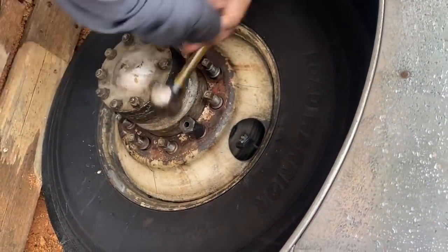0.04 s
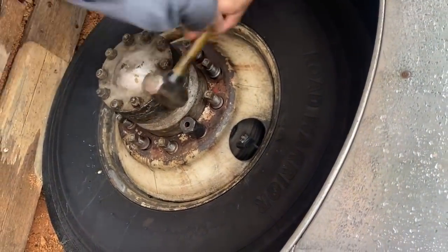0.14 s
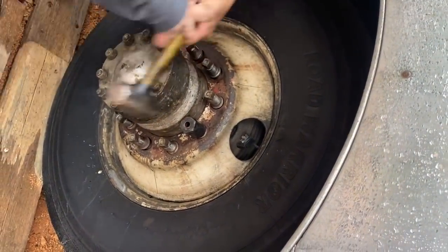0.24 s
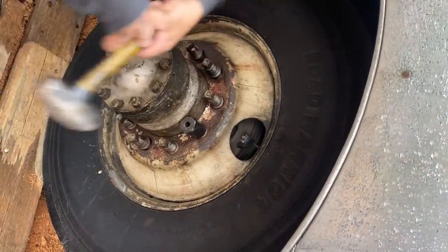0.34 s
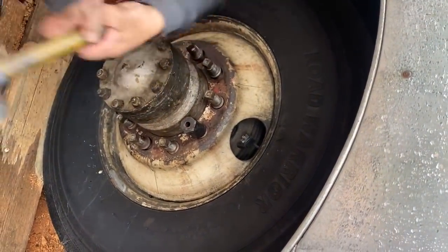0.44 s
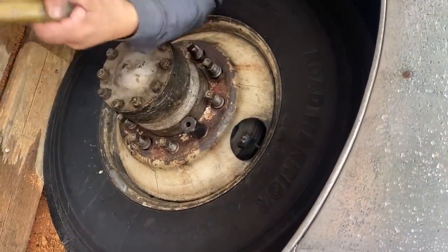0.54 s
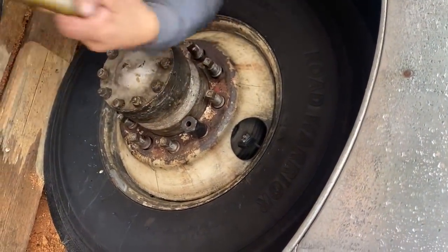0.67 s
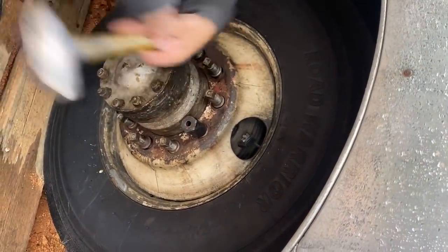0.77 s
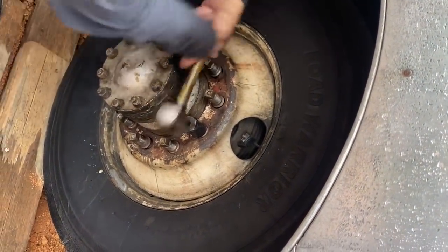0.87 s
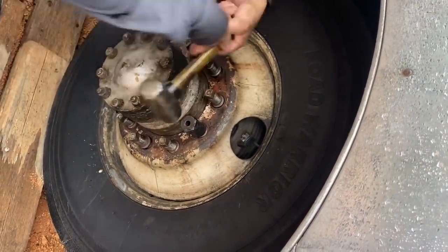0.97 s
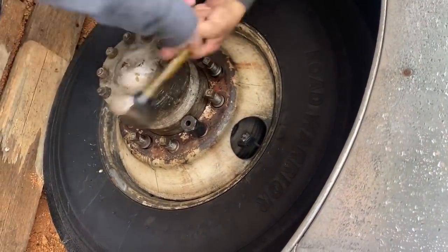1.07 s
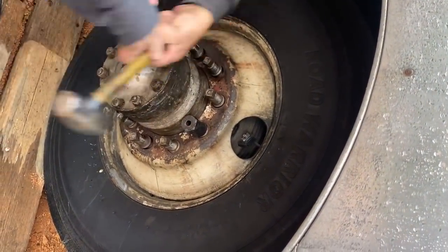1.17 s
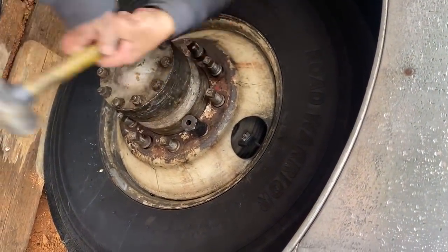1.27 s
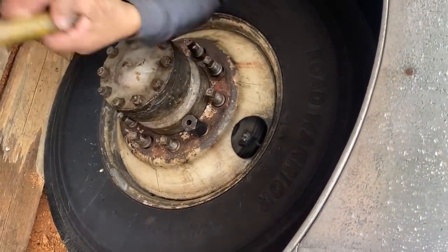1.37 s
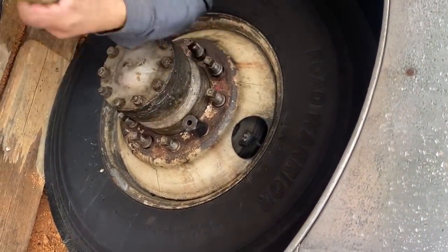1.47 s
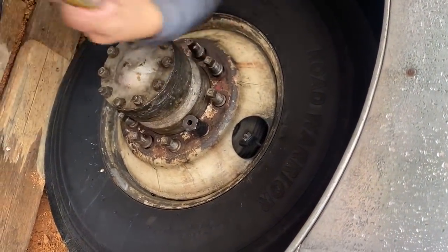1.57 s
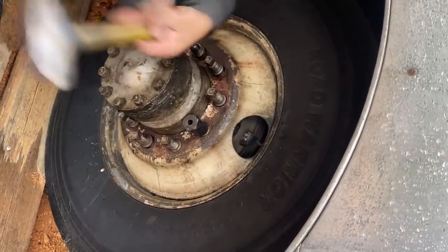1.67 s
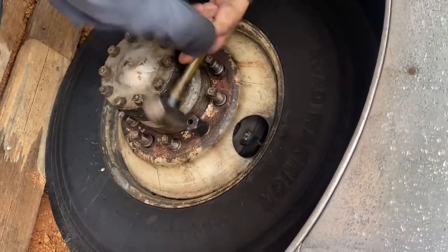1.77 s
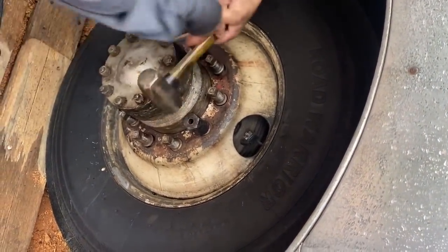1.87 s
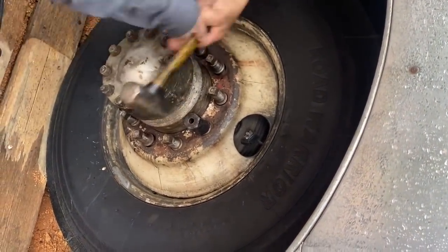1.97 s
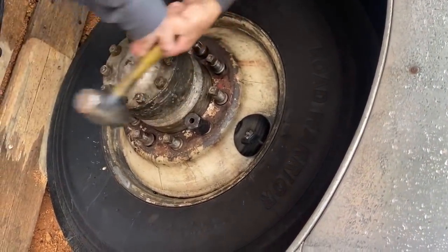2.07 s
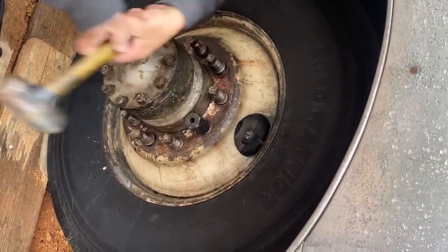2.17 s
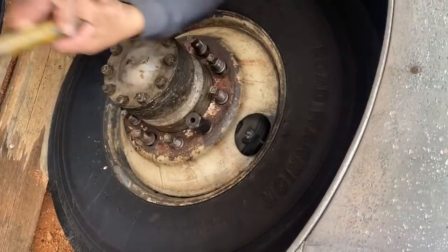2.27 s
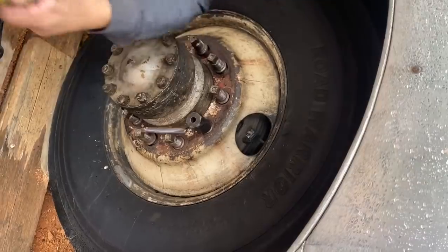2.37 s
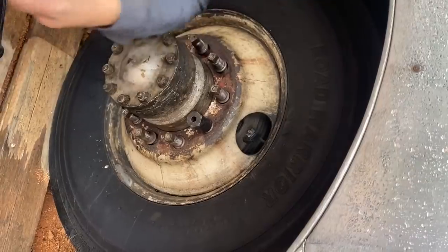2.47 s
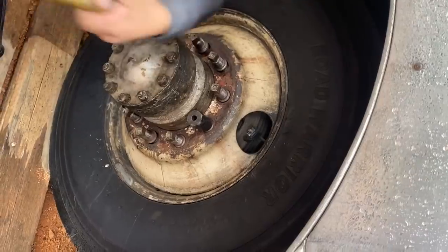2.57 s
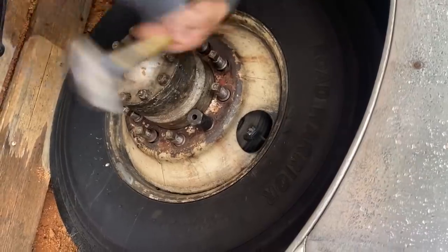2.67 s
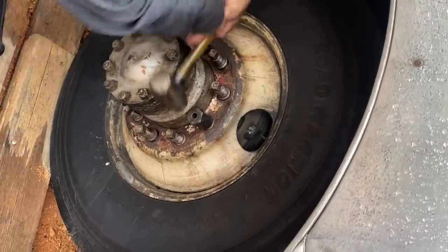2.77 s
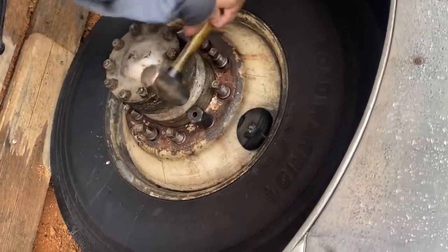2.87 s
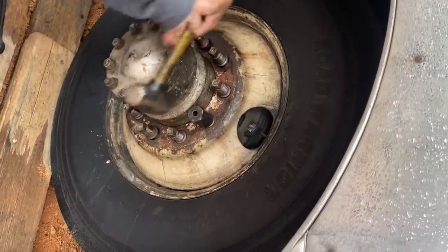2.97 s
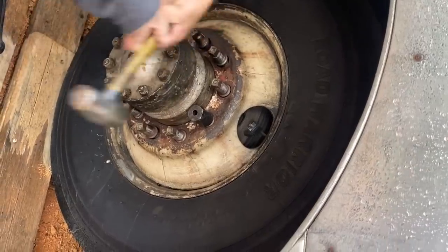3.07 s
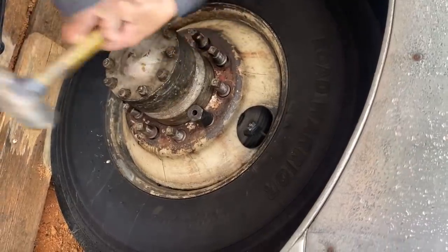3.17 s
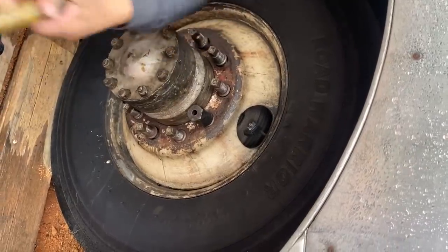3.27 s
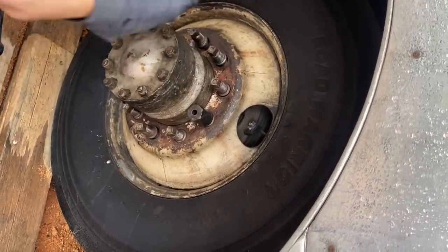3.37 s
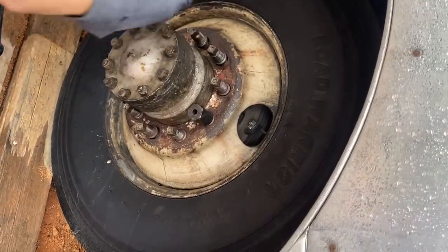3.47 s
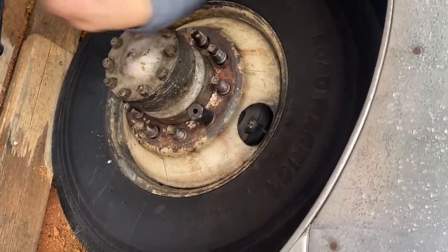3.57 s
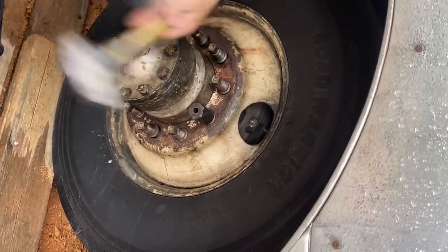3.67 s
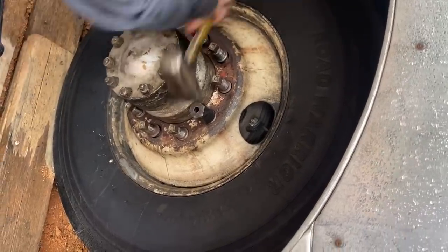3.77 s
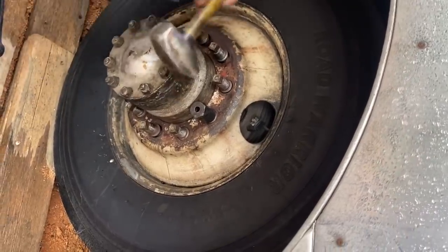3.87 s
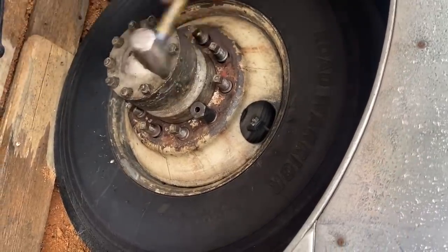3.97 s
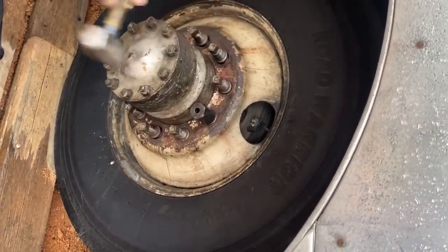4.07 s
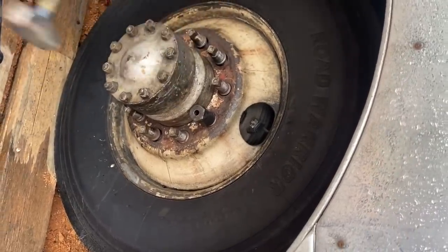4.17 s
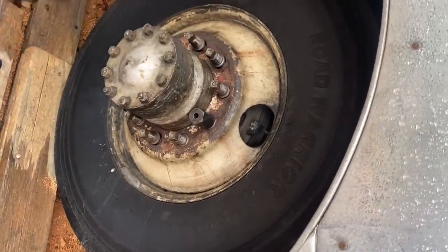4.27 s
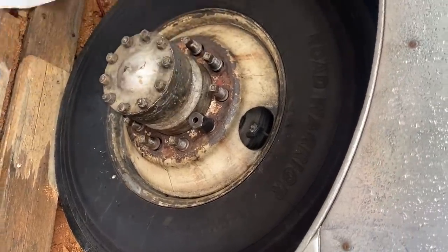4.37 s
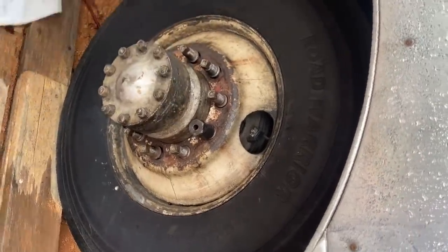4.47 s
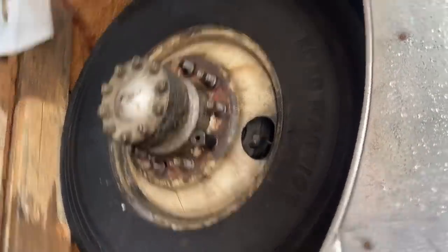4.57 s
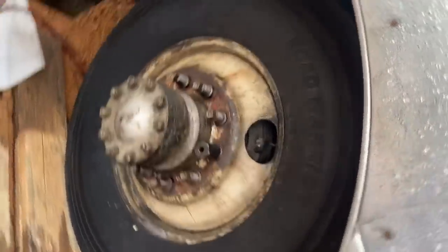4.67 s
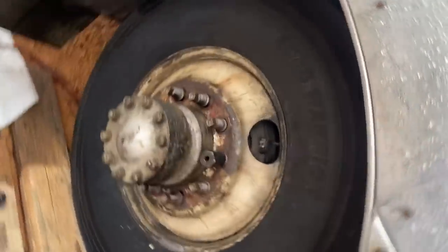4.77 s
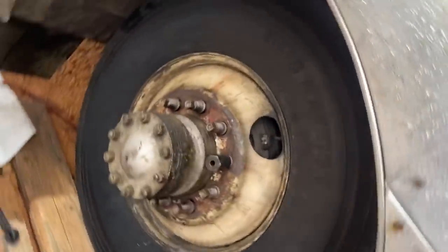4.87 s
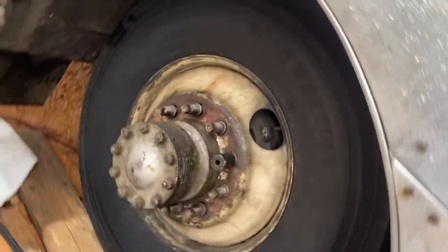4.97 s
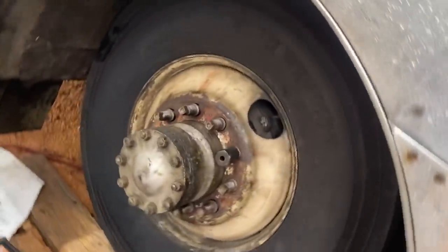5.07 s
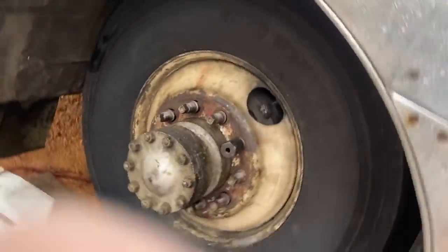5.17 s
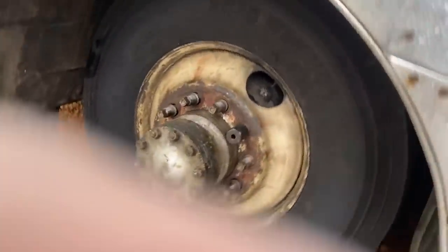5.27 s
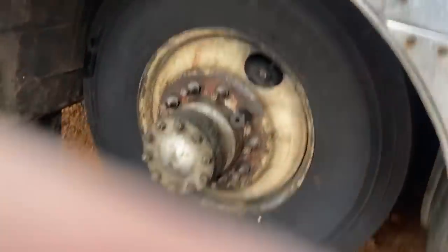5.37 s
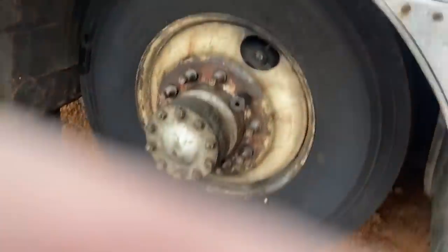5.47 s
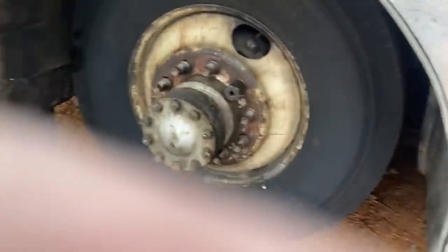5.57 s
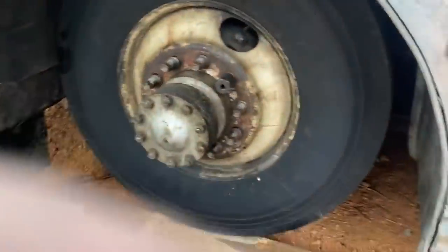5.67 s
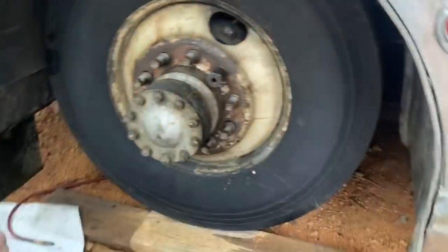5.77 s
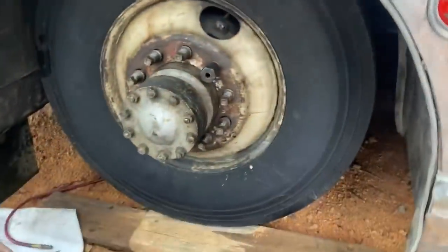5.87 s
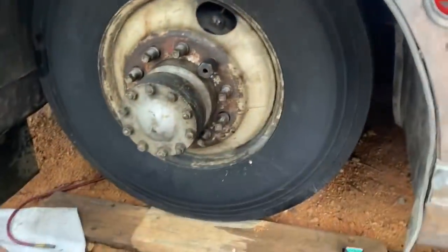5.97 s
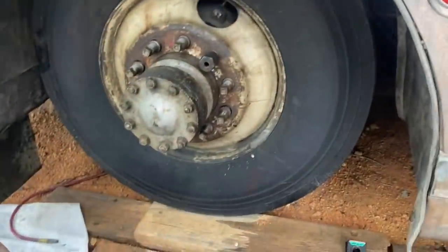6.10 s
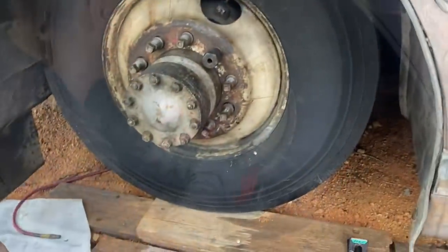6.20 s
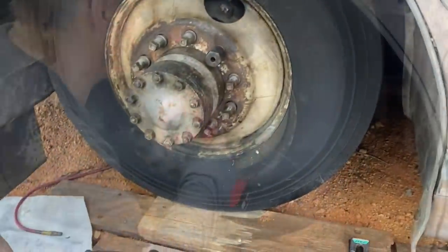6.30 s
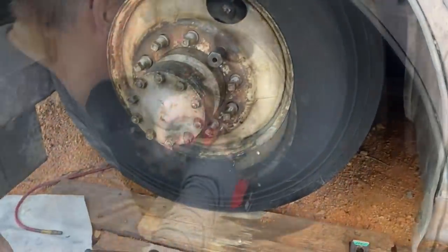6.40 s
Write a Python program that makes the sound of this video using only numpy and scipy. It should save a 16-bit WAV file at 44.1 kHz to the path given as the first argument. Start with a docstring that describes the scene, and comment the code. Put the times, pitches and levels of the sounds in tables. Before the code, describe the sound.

Close by in a yard, a sledgehammer hits a steel socket on a truck wheel nut five times, about once a second. Each blow is a sharp metal clank, followed by a softer ring from the rim and a low boom from the tyre. Then fingers briefly rub, squeak and bump on the hand-held microphone, and something gritty crunches at the end. Faint ticks, far traffic and hiss lie underneath.

```python
"""A sledge hammer strikes a steel socket on a truck wheel nut five times, near a hand-held camera in a yard.
Socket and hub clank briefly; the rim and the air in the tyre ring on. A diffuse ring swells up after
each blow, then fades. Faint ticks sound over far traffic and microphone hiss. Then fingers rub, squeak
and bump on the camera housing, and something crunches close by as the background grows louder."""
import sys
import numpy as np
from scipy import signal
from scipy.fft import rfft, irfft, next_fast_len
from scipy.io import wavfile
from scipy.ndimage import map_coordinates

SR = 44100
rng = np.random.default_rng(int(sys.argv[2]) if len(sys.argv) > 2 else 0)


def store_wav(level_fs):
    """Save 16-bit WAV to argv[1]."""
    pcm = np.round(np.clip(np.atleast_2d(level_fs), -1, 1) * 32767)
    wavfile.write(sys.argv[1], SR, pcm.T.astype(np.int16))


N = 283988


def amp(db):
    """Gain of a level in dB."""
    return 10 ** (np.asarray(db) / 20)


def unit(x):
    """x at rms 1."""
    return x / np.sqrt(np.mean(x ** 2) + 1e-20)


def along(points, hz):
    """Interpolate (frequency [Hz], value) points on a log axis."""
    knots_hz, values = np.transpose(points)
    return np.interp(np.log(hz + 1), np.log(knots_hz + 1), values)


def wobble(rate_hz):
    """Smooth random curve, rate_hz knots a second."""
    knots = rng.standard_normal(int(N * rate_hz / SR) + 4)
    return map_coordinates(knots, [np.arange(N) * rate_hz / SR])


def hiss(spectrum, size=N):
    """Coloured noise of rms 1."""
    n_fft = next_fast_len(size)
    gain = amp(along(spectrum, np.fft.rfftfreq(n_fft, 1 / SR)))
    return unit(irfft(rfft(rng.standard_normal(n_fft)) * gain, n_fft)[:size])


def fading_noise(spectrum, t60s, size):
    """Coloured noise, each frequency with its own decay time."""
    hz, t, bins = signal.stft(hiss(spectrum, size), SR, nperseg=256)
    decay = amp(-60 * t / along(t60s, hz)[:, None])
    return signal.istft(bins * decay, SR, nperseg=256)[1][:size]


def ringing(pitches_hz, modes, t, spread_db, rise_cycles, wander):
    """Damped modes at random strengths; low and long-ringing ones build up more slowly."""
    hz = np.array(pitches_hz)[:, None]
    db, t60_s = np.transpose(modes)[:, :, None]
    strength, phase = rng.standard_normal((2, len(hz), 1))
    walk = np.cumsum(rng.standard_normal((len(hz), len(t))), axis=1)
    drift_rad = wander * np.sqrt(hz / SR) * walk  # close neighbours blur each line
    rise = 1 - np.exp(-(t / (rise_cycles / hz + .035 * t60_s)) ** 2)
    decay = amp(db + spread_db * strength - 60 * t / t60_s)
    return np.sum(decay * rise * np.sin(2 * np.pi * hz * t + 3 * phase + drift_rad), axis=0)


def tilt(x, sos, db):
    """Boost or cut the filter's passband by about db."""
    return x + (amp(db) - 1) * signal.sosfilt(sos, x)


def ping_envelope(cycles, life_cycles):
    """Rise within about a cycle, then exponential decay."""
    return np.exp(-2.5 * cycles / life_cycles) * (1 - np.exp(-1.5 * cycles))


def stroke(start_s, hold_s, db, rise_db_s, drift_db_s, fall_db_s):
    """Gain per sample: reaches db at start_s, drifts while held, then dies."""
    t = np.arange(N) / SR - start_s
    held_db = db + drift_db_s * np.clip(t, 0, hold_s)
    return amp(held_db + rise_db_s * np.minimum(t, 0) - fall_db_s * np.maximum(t - hold_s, 0))


def add(track, at_s, sound):
    """Mix a sound into a track that starts at -1 s."""
    part = track[SR + round(at_s * SR):][:len(sound)]
    part += sound[:len(part)]


def socket_clank(t, thud_band):
    """Socket and hub: a contact crack and short steel modes, the dense ones as noise."""
    # socket and hub modes (pitch [Hz])
    steel_hz = [140, 183, 235, 430, 556, 677, 990, 1168, 1400, 1500, 1630, 2015, 2085, 2191, 2420, 2630,
                2813, 2907, 3040, 3181, 3600, 3873, 4420, 4790, 5140, 5720, 5920, 6500, 7500, 8500]
    # per mode (level [dB], t60 [s])
    steel_modes = [(-6, .05), (-14, .2), (-5, .04), (4, .045), (-13, .13), (-9, .04), (-2, .045), (-1, .05),
                   (-16, .15), (-3, .045), (-3, .05), (-2, .075), (-5, .11), (-7, .125), (-11, .16),
                   (-9, .09), (-2, .125), (-8, .07), (-4, .08), (-1, .06), (-8, .055), (-4, .065),
                   (-2, .045), (-12, .065), (-12, .085), (-5, .035), (-13, .085), (-17, .045), (-17, .06),
                   (-6, .05)]
    # dense modes (frequency [Hz], density [dB])
    dense_spectrum = [(35, -38.5), (60, -7.5), (431, 0.5), (1050, -8.5), (2080, -9.5), (2630, -15.5),
                      (2890, -10.5), (4110, -11), (5840, -10.5), (13600, -21.5), (16400, -38)]
    # their decay (frequency [Hz], t60 [s])
    dense_t60 = [(100, 0.14), (500, 0.079), (2500, 0.17), (6000, 0.096), (15000, 0.11)]
    # first contact (frequency [Hz], density [dB])
    crack_spectrum = [(300, -32), (1000, -6), (3000, -2.5), (6000, -7.5), (9000, -10), (14500, -11.5),
                      (16400, -11.5)]
    noise = amp(-2.5) * fading_noise(dense_spectrum, dense_t60, len(t))
    noise += amp(5.5 - 60 * t / .033) * hiss(crack_spectrum, len(t))
    noise -= np.exp(-(t / .005) ** 2) * signal.sosfilt(thud_band, noise)  # the heavy hub is slow to move
    attack = 1 - np.exp(-t / .00078)
    return ringing(steel_hz, steel_modes, t, spread_db=2, rise_cycles=1.3, wander=.045) + attack * noise


def tyre_boom(t):
    """The air in the tyre resonates at low pitches."""
    # cavity modes (pitch [Hz])
    tyre_hz = [75, 91, 116, 168, 191, 219]
    # per mode (level [dB], t60 [s])
    tyre_modes = [(-3.5, 0.43), (-5, 0.68), (-0.5, 0.6), (-3, 0.87), (-1.5, .7), (-7.5, 0.85)]
    return ringing(tyre_hz, tyre_modes, t, spread_db=2, rise_cycles=3, wander=.25)


def rim_ring(t):
    """Rim and brake drum ring on in lightly damped modes."""
    # rim and drum modes (pitch [Hz])
    rim_hz = [409, 556, 812, 855, 928, 1020, 1246, 1273, 1340, 1370, 1501, 1776, 1999, 2067, 2174, 2215,
              2379, 2417, 2815, 2904, 2947, 3020, 3116, 3477, 3552, 4002, 4228, 4548, 5143, 5383]
    # per mode (level [dB], t60 [s])
    rim_modes = [(-4, .8), (-13, 1.3), (0, .7), (0, .85), (-9, .8), (-8, 1.1), (-5, .75), (-1, .8),
                 (-7, .65), (-4, 1.1), (-8, .75), (-6, .75), (-6, .7), (-9, .8), (-6, .7), (-10, .9),
                 (-2, .55), (-7, .6), (-9, .75), (-4, .7), (-11, .8), (-8, .75), (-8, .7), (-10, .55),
                 (-4, .65), (-11, .65), (-12, .7), (-13, .6), (-8, .55), (-7, .55)]
    return ringing(rim_hz, rim_modes, t, spread_db=3.5, rise_cycles=3, wander=.09)


def diffuse_ring(t):
    """A noisy ring after the blow; its treble fades first."""
    # ring colour (frequency [Hz], density [dB])
    ring_spectrum = [(35, -37), (60, -14), (180, -9), (250, -22), (700, -29), (1300, -24), (2500, -21),
                     (3700, -27), (5600, -24), (6500, -30), (8500, -28), (10000, -33), (14500, -40),
                     (16400, -43)]
    # its decay (frequency [Hz], t60 [s])
    ring_t60 = [(100, 0.99), (500, 1.4), (2500, 1), (6000, 0.81), (15000, .6)]
    return fading_noise(ring_spectrum, ring_t60, len(t))


def hammer():
    """Each blow: clank and tyre boom; the rim ring and a diffuse ring swell up, then fade."""
    # blows (time [s], level [dB], thud [dB], body [dB], treble [dB])
    blows = [(-.011, -11.5, 0, -0.5, 0.5), (0.848, -11.5, 4.5, -1.5, 0.5), (1.7564, -11.5, 2.5, 2, -1.5),
             (2.7219, -12, 1, 3, 0.5), (3.7234, -12.5, 4, -1, 3)]
    track, t = np.zeros(N + SR), np.arange(SR + SR // 4) / SR
    thud_band = signal.butter(2, 600, "low", fs=SR, output="sos")
    body_band = signal.butter(1, [650, 1300], "band", fs=SR, output="sos")
    treble_band = signal.butter(2, 5000, "high", fs=SR, output="sos")
    swell = 1 - .7 * np.exp(-(t / .16) ** 2)
    for at_s, db, thud_db, body_db, treble_db in blows:
        clank = socket_clank(t[:SR // 3], thud_band)
        for band, band_db in (thud_band, thud_db), (body_band, body_db), (treble_band, treble_db):
            clank = tilt(clank, band, band_db)
        add(track, at_s, amp(db) * clank)
        boom = amp(-30.5 + .36 * thud_db) * tyre_boom(t)
        tail = amp(-4.5) * rim_ring(t) + diffuse_ring(t)
        tail = amp(-27.5) * swell * tilt(tail, treble_band, treble_db + 1.5)
        add(track, at_s, amp(db) * (boom + tail))
    return track[SR:]


def background(db=-65, waver_db=1.06, lift_at_s=6.15, lift_ramp_s=.16, lift_db=9.5):
    """Far traffic and microphone hiss; the level wavers, and rises at the end."""
    # traffic and hiss (frequency [Hz], density [dB])
    spectrum = [(15, -72), (25, -44.5), (58, -4.5), (101, 0), (160, -11), (298, -17), (434, -20.5),
                (650, -21), (1180, -19.5), (2240, -19.5), (2780, -20.5), (11600, -29.5), (15600, -29)]
    lift = np.clip((np.arange(N) / SR - lift_at_s) / lift_ramp_s, 0, 1)
    return amp(db + lift_db * lift + waver_db * wobble(6)) * hiss(spectrum)


def ticks():
    """Damped pings, each with a noise puff at its pitch; high ones last more cycles."""
    # small ticks (time [s], level [dB], pitch [Hz])
    pings = [(.380, -47.5, 12900), (2.141, -51, 2280), (2.538, -45, 970), (2.541, -51, 2820),
             (2.609, -43.5, 12000), (3.274, -48, 12100), (4.365, -44, 1170), (4.649, -47, 12050),
             (4.754, -53, 12000), (5.075, -47.5, 885), (5.265, -39.5, 1960), (5.328, -51, 7000),
             (5.378, -42.5, 1580), (5.552, -47.5, 11070), (5.759, -48.5, 1470), (5.815, -51.5, 692),
             (6.043, -51.5, 11000)]
    track, t = np.zeros(N + SR), np.arange(SR // 10) / SR
    for at_s, db, hz in pings:
        cycles = t * hz
        envelope = ping_envelope(cycles, life_cycles=5.7 * (hz / 1000) ** .5)
        puff = hiss([(hz / 4, -25), (hz, 0), (hz * 5, -14)], len(t))
        noise_share = np.clip(hz / 3000, .2, .95)  # high ticks are hardly pitched
        ping = (1 - noise_share) * np.sin(2 * np.pi * cycles) + noise_share * puff
        add(track, at_s, amp(db) * envelope * ping)
    return track[SR:]


def fingers(squeak_hz=957, squeak_cap_db=-64, squeak_end_s=5.26):
    """Skin slips unevenly over the housing and squeaks in fits while it slides lightly."""
    # sliding envelope (time [s], level [dB])
    rub = [(5.09, -78), (5.152, -56.5), (5.232, -64), (5.266, -47.5), (5.286, -62), (5.366, -73),
           (5.38, -57.5), (5.42, -90)]
    # skin friction (frequency [Hz], density [dB])
    skin_spectrum = [(180, -24), (300, -17.5), (968, -11), (1310, -17), (1570, -9.5), (1770, -16.5),
                     (5810, -22), (14600, -18.5), (16400, -24)]
    t = np.arange(N) / SR
    rub_s, rub_db = np.transpose(rub)
    slide = amp(np.interp(t, rub_s, rub_db, -150, -150))
    tone = hiss([(squeak_hz * .7, -30), (squeak_hz, 0), (squeak_hz * 1.25, -30)])
    squeak_gain = np.minimum(slide, amp(squeak_cap_db)) * (t < squeak_end_s)
    squeak = squeak_gain * unit(amp(3.7 * wobble(60)) * tone)
    friction = slide * unit(amp(wobble(150)) * hiss(skin_spectrum))
    return friction + squeak


def housing_bumps(sag_per_cycle=.32):
    """Dull bumps on the camera: a few soft cycles whose pitch sags as they fade."""
    # bumps (time [s], level [dB], starting pitch [Hz])
    bumps = [(5.192, -31.5, 845), (5.270, -41.5, 382), (5.279, -30, 140), (6.397, -40, 170)]
    track, t = np.zeros(N + SR), np.arange(SR // 10) / SR
    for at_s, db, hz in bumps:
        cycles = t * hz
        tone = np.sin(2 * np.pi * np.log1p(sag_per_cycle * cycles) / sag_per_cycle)
        add(track, at_s, amp(db) * ping_envelope(cycles, life_cycles=3.04) * tone)
    return track[SR:]


def crunch(snap_t60_s=.05):
    """A thin scrape, then sharp snaps over a bed of clumped grit."""
    # snaps (time [s], level [dB], treble [dB])
    snaps = [(6.1866, -32.5, -15), (6.1915, -24, 1.5), (6.2, -32.5, 13.5), (6.2191, -29.5, 2),
             (6.232, -34, 9), (6.241, -24.5, -2.5), (6.2558, -29.5, 1.5), (6.267, -31.5, 0),
             (6.2974, -31.5, -6), (6.3024, -33, 4)]
    # snaps and grit bed (frequency [Hz], density [dB])
    grit_spectrum = [(35, -51), (60, -17), (366, -11), (1130, -3), (1570, 1), (2300, -9.5), (2960, -2.5),
                     (4200, -8.5), (5600, -15.5), (9000, -14.5), (14900, -17), (16400, -28)]
    # scrape (frequency [Hz], density [dB])
    scrape_spectrum = [(1500, -34), (2800, 4.5), (3600, -9), (4600, -6), (7200, -22), (7700, 1),
                       (8200, -20.5), (15000, -18)]
    track, t = np.zeros(N + SR), np.arange(SR // 10) / SR
    treble_band = signal.butter(2, 3500, "high", fs=SR, output="sos")
    for at_s, db, treble_db in snaps:
        burst = tilt(hiss(grit_spectrum, len(t)), treble_band, treble_db)
        add(track, at_s, amp(db - 60 * t / snap_t60_s) * burst)
    scrape = stroke(start_s=6.165, hold_s=.021, db=-51.5, rise_db_s=1175, drift_db_s=270, fall_db_s=2350)
    scrape *= hiss(scrape_spectrum)
    bed = stroke(start_s=6.195, hold_s=.115, db=-35.5, rise_db_s=1300, drift_db_s=-78, fall_db_s=730)
    bed *= unit(amp(3.7 * wobble(300)) * hiss(grit_spectrum))
    return track[SR:] + scrape + bed


def scene():
    """All sources at one microphone."""
    return (hammer() + ticks() + housing_bumps() + fingers() + crunch() + background())[None]


def record(dry):
    """The input saturates softly on the blows, loses deep bass and falls steeply at its band limit."""
    ceiling, low_cut_hz, top_hz = .95, 45, 15760
    x = dry / (1 + np.abs(dry / ceiling) ** 5) ** (1 / 5)
    x = signal.sosfilt(signal.butter(2, low_cut_hz, "high", fs=SR, output="sos"), x)
    n_fft = next_fast_len(N + SR // 2)
    above_top_hz = np.fft.rfftfreq(n_fft, 1 / SR) - top_hz
    edge_db = np.interp(above_top_hz, [0, 60, 1100, 1150], [0, -22, -45, -120])
    return irfft(rfft(x, n_fft) * amp(edge_db), n_fft)[:, :N]


dry = scene()
out = record(dry)
store_wav(out)
```